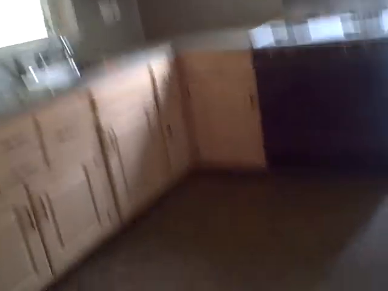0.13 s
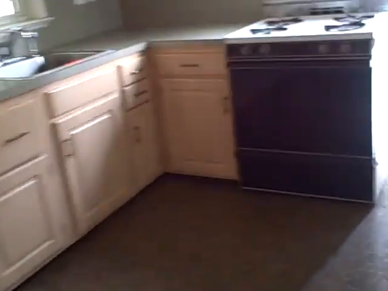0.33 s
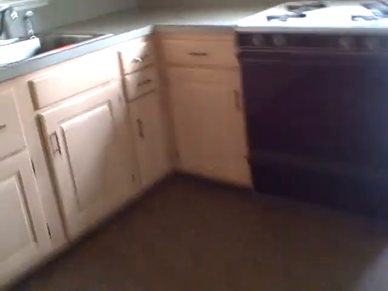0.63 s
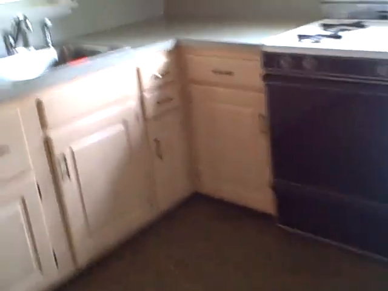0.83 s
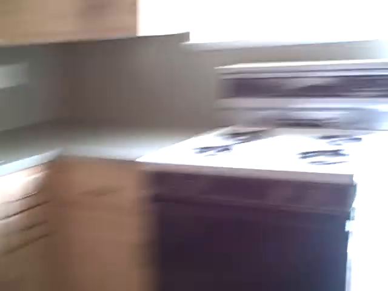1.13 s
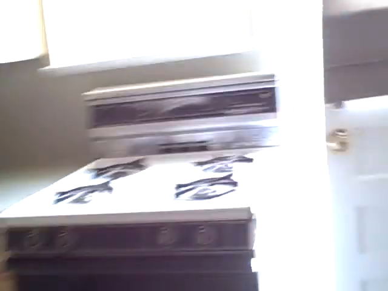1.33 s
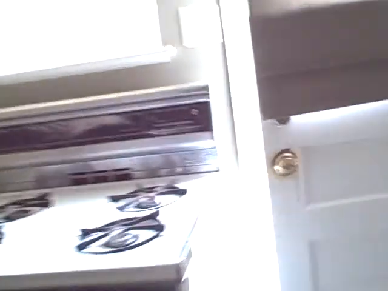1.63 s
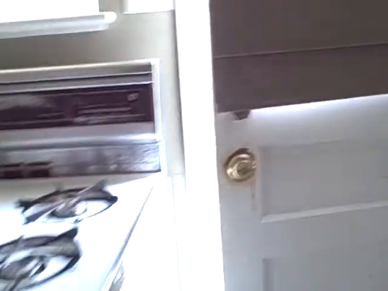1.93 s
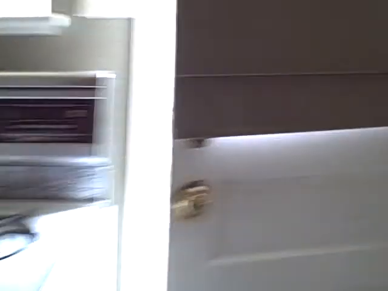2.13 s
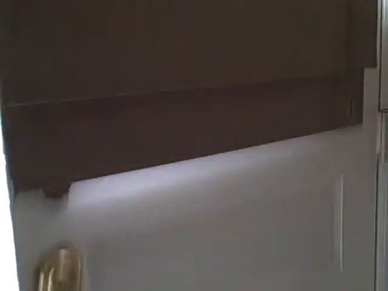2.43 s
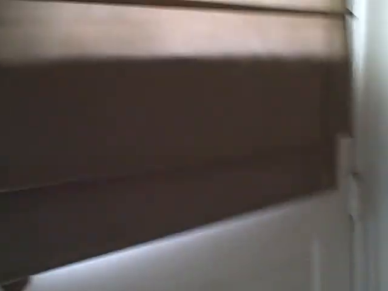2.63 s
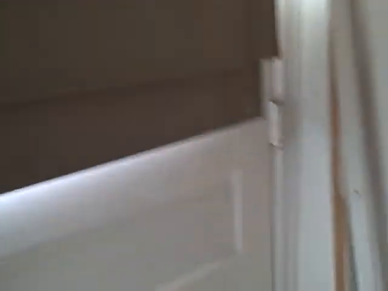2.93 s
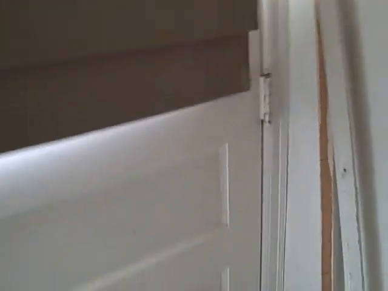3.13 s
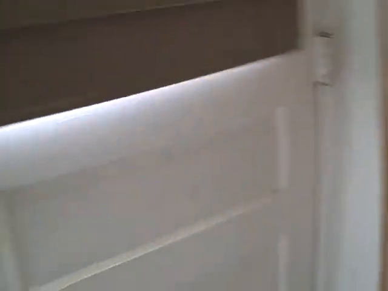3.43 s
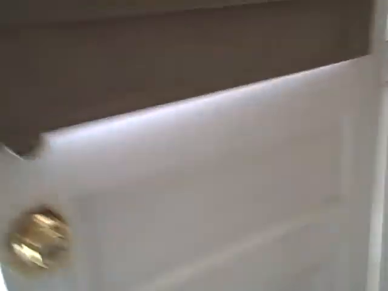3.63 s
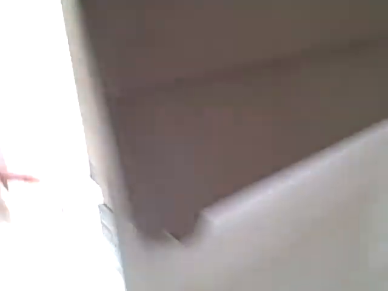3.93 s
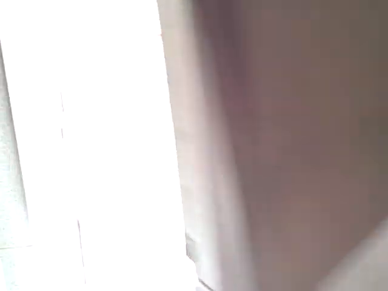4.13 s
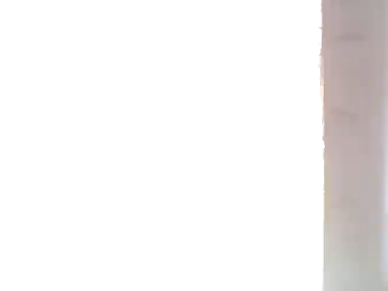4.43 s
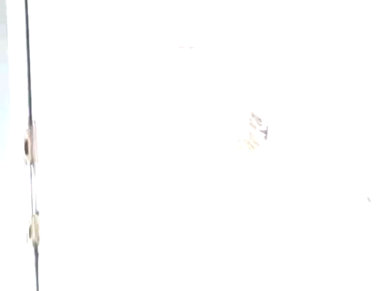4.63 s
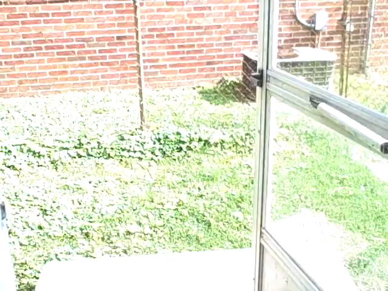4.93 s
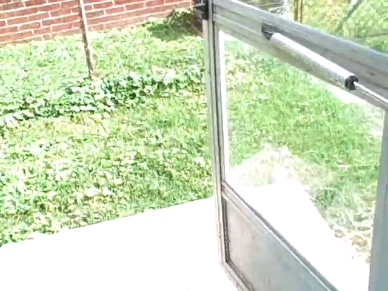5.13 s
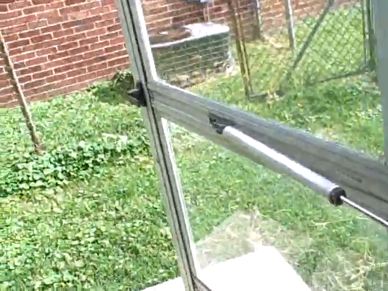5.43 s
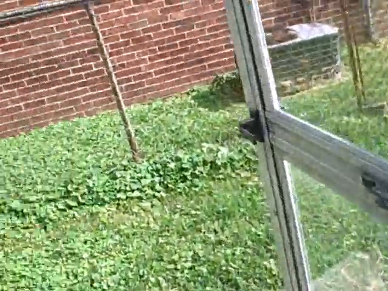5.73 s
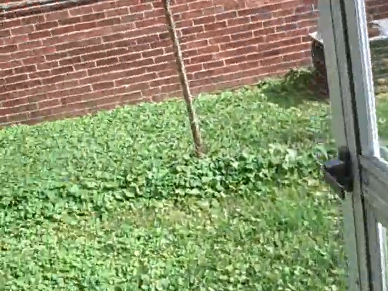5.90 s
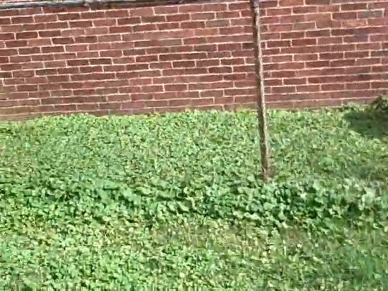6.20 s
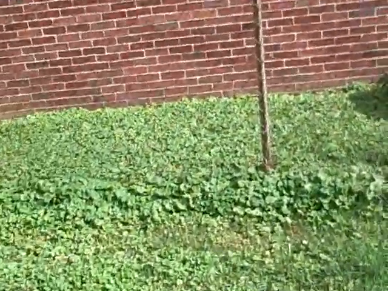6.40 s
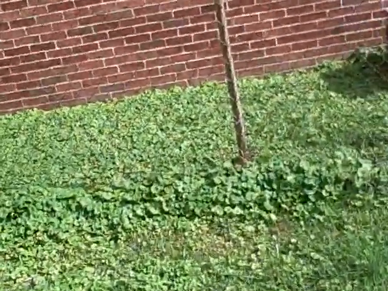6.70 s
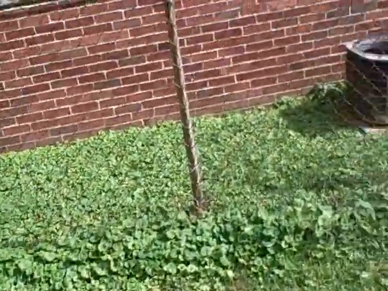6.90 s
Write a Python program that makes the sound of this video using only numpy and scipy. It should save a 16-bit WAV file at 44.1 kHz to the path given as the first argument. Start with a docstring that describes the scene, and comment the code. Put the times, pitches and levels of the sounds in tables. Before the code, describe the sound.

A handheld camera microphone catches a loud, multi-contact door slam ringing through a bare room, then quickening small ticks and a few heel knocks on springy boards. Two quick tugs free another door, with a latch click and low shudder. The quiet outdoor drone of cooling units gradually opens up, with thin insect hiss, while fingers knock and rub the plastic case until the end.

```python
"""Back door slam and a walk outside

A wooden door slams in a ringing kitchen: bursts of noise crack, thud and clatter, and fading tones ring the slab.
Something loose ticks ever faster; then heel knocks and low swings make footsteps on a springy floor.
The door is pulled open with woody tones and latch noise, and the camera is carried out through it.
Air conditioners hum and rush as shaped noise and steady tones, insects shrill in thin bands of noise,
and fingers tap on the camera body as short, dry tones with gritty ticks."""
import sys
import numpy as np
from scipy import signal
from scipy.fft import rfft, irfft, next_fast_len
from scipy.io import wavfile
from scipy.ndimage import map_coordinates

SR = 44100
rng = np.random.default_rng(int(sys.argv[2]) if len(sys.argv) > 2 else 0)


def master(y):
    """Save y as 16-bit WAV."""
    cut = np.clip(np.atleast_2d(y).T, -1, 1)
    pcm = np.round(cut * 32767)  # scale
    wavfile.write(sys.argv[1], SR, pcm.astype(np.int16))


N = 311346
T = np.arange(N) / SR  # time in the scene (s)
AGE = T[:SR * 3 // 2]  # time since a single event began (s), up to 1.5 s

# Tables of pitch_hz and level_db give the colour of a noise, whose loudness is set where it is used.
# A t60_s is the time in which a sound fades by 60 dB.

# colour of a heel on wood: pitch_hz, level_db (per Hz)
HEEL_COLOUR = [(60, -37), (150, -2), (320, -4.5), (600, -10), (900, -15), (2000, -25), (8000, -38)]
# colour of a small bright contact: pitch_hz, level_db (per Hz)
CLICK_COLOUR = [(500, -1), (2000, -3), (4000, -2), (7000, -3.5), (9500, -6.5), (13000, -12), (16000, -16.5)]
# fingers on the camera body: start_s, knock_db, pitch_hz, t60_s, tick_db
FINGER_TAPS = [(3.836, -50, 890, .02, -54), (4.9593, -30, 470, .014, -63), (5.7028, -26.5, 482, 0.029, -46),
               (5.7922, -35.5, 610, 0.019, -51), (5.824, -51, 1510, .03, -45),
               (5.9148, -43, 2400, .012, -42), (6.4949, -30.5, 904, 0.035, -60),
               (6.985, -32, 736, .035, -49)]


def amp(db):
    """Turn decibels into a gain."""
    return 10 ** (np.asarray(db) / 20)


def unit(x):
    """Scale a sound to an average (rms) strength of 1."""
    return x / np.sqrt(np.mean(x ** 2) + 1e-20)


def along(points, hz):
    """Read a table of (pitch_hz, value) between its rows, on a log pitch axis."""
    f, v = np.transpose(points)
    return np.interp(np.log(hz + 1), np.log(f + 1), v)


def fade(t, t60):
    """Die away by 60 dB in t60 seconds."""
    return np.exp(-np.log(1000) * t / t60)


def onset(rise):
    """Grow smoothly from 0 towards 1; a larger rise (s) is slower."""
    return 1 - np.exp(-AGE / rise)


def ramp(start, length):
    """Rise from 0 to 1 over length seconds."""
    return np.clip((T - start) / length, 0, 1)


def swell(s, width):
    """Rise and fall in a bell shape around s seconds."""
    return np.exp(-.5 * ((T - s) / width) ** 2)


def wobble(rate):
    """Draw a smooth random curve through rate random points a second."""
    points = rng.standard_normal(int(N * rate / SR) + 4)
    return map_coordinates(points, [T * rate])


def add(track, s, sound):
    """Mix a sound into the track at s seconds."""
    start = max(round(s * SR), 0)
    track[start:start + len(sound)] += sound[:N - start]


def noise(spectrum, size):
    """Colour white noise by weighting each of its frequencies, then scale it to rms 1."""
    m = next_fast_len(size)
    white = rfft(rng.standard_normal(m))
    weights = amp(along(spectrum, np.fft.rfftfreq(m, 1 / SR)))
    return unit(irfft(white * weights, m)[:size])


def echo(spectrum, rise):
    """Answer a blow as the kitchen does: reflections pile up, then each frequency dies at its own speed."""
    # how long the bare room rings: pitch_hz, t60_s
    kitchen_fade = [(50, 0.81), (130, 0.8), (300, 0.73), (900, 0.85), (2000, 0.81), (4200, 0.81),
                    (8000, 0.62), (15000, 0.62)]
    hz, t, z = signal.stft(noise(spectrum, len(AGE)), SR, nperseg=512)
    fading = z * fade(t, along(kitchen_fade, hz)[:, None])
    tail = signal.istft(fading, SR, nperseg=512)[1][:len(AGE)]
    return tail * onset(rise)


def ring(modes, rise, scatter_db):
    """Ring an object's fading tones (pitch_hz, level_db, t60_s), with random phases and varied levels."""
    tones = np.zeros(len(AGE))
    for hz, db, t60 in modes:
        strength = amp(db + scatter_db * rng.normal())
        tones += strength * fade(AGE, t60) * np.sin(2 * np.pi * (hz * AGE + rng.random()))
    return tones * onset(rise)


def throbs(rows, rise):
    """Swing low and die away once for each row of (start_s, level_db, pitch_hz, t60_s)."""
    out = np.zeros(N)
    for s, db, hz, t60 in rows:
        swing = np.sin(2 * np.pi * hz * AGE) * fade(AGE, t60)
        add(out, s, amp(db) * swing * onset(rise))
    return out


def click():
    """Make a small bright contact: a short burst of noise and its kitchen echo."""
    return echo(CLICK_COLOUR, rise=0.0026) + 2.15 * noise(CLICK_COLOUR, len(AGE)) * fade(AGE, 0.026)


def yard():
    """Air conditioners drone and rush; the doorway colours their hum until the camera is outside."""
    # base level of the yard from the approach to the door onwards: start_s, level_db
    yard_level = [(2.1, -62), (2.9, -56.5), (3.3, -56), (3.54, -57.5), (3.87, -58.5), (4.25, -57),
                  (5.04, -51.5), (5.55, -53.5), (5.8, -51.5), (6.62, -51), (7.06, -45)]
    # steady tones of the outdoor unit: pitch_hz, level_db (relative)
    machine_tones = [(143, -8), (163, 4), (203, -8), (239, -6.5), (636, -5)]
    # hum heard from inside, then outside: pitch_hz, level_db (per Hz)
    doorway_colour = [(70, -12), (130, 1), (180, 1.5), (220, -4.5), (275, 9), (310, -2), (365, -1),
                      (430, -10), (700, -49)]
    open_air_colour = [(70, -11), (130, 6), (165, 6), (185, -13.5), (205, 2.5), (260, -0.5), (340, -5.5),
                       (450, -41), (700, -36)]
    # colours of the rush, hiss and rumble: pitch_hz, level_db (per Hz)
    rush_colour = [(240, -17), (410, -9), (500, -1), (650, -3.5), (850, -1), (1050, -4), (1400, -5),
                   (2000, -8.5), (3400, -19), (4000, -20.5), (5500, -49), (9000, -90)]
    hiss_colour = [(1650, -15), (2800, -4.5), (4300, -1.5), (6200, -5.5), (7700, -11.5), (9400, -15.5),
                   (12000, -16), (13300, -23), (15800, -19)]
    rumble_colour = [(12, -9.5), (26, 5), (42, -5.5), (60, -1.5), (85, -6), (120, -14), (250, -51)]
    # level by place: kitchen_db, door_db, outside_db; hum and hiss count from the yard's level
    hum_by_place = (-1.5, 5, -1)
    hiss_by_place = (-6, -10, -16.5)
    rumble_by_place = (-50.5, -48, -48.5)

    far_db = -63.5  # level at the start, from the far side of the kitchen
    level_db = np.interp(T, *np.transpose([(0, far_db)] + list(yard_level)))
    near = ramp(2.1, 0.29)  # the camera comes up to the door
    outside = ramp(5.08, 0.97)  # and passes out into the open

    def by_place(kitchen, door, open_air):
        """Glide between the three levels as the camera moves."""
        return kitchen + (door - kitchen) * near + (open_air - door) * outside

    tones = np.zeros(N)
    for hz, db in machine_tones:
        strength = amp(db + 1.2 * wobble(4.6))
        tones += strength * np.sin(2 * np.pi * hz * T + 0.52 * wobble(4))
    hum = np.sqrt(1 - outside) * noise(doorway_colour, N)
    hum += np.sqrt(outside) * 0.92 * noise(open_air_colour, N)
    hum += 0.58 * outside ** 2 * unit(tones)

    # the bass wanders with the air at the microphone and swells as air moves through the open doorway
    draught_db = 2 * swell(4.9, 0.37) + 1.5 * wobble(7)
    rumble = amp(by_place(*rumble_by_place) + draught_db) * noise(rumble_colour, N)

    # the rush flutters only slightly
    flutter_db = 0.35 * wobble(12)
    rush = noise(rush_colour, N) + amp(by_place(*hiss_by_place)) * noise(hiss_colour, N)
    rush *= amp(flutter_db + 0.32)
    hum_gain = amp(by_place(*hum_by_place) + 1.85 * wobble(3.7))
    return rumble + amp(level_db) * (hum_gain * hum + rush)


def insects():
    """Narrow, swelling bands of shrilling, as of insects in the grass, come in as the door opens."""
    # the shrill bands: pitch_hz, width_hz, level_db (once outside), swell_db
    shrill_bands = [(7680, 1200, -72, .8), (9200, 660, -87, 3), (12100, 1140, -96, 3.5)]
    opened_db = np.interp(T, [2.7, 4.2, 5.5], [-22, -9, 0])
    out = np.zeros(N)
    for hz, width, db, swell_db in shrill_bands:
        colour = [(hz - 2 * width, -70), (hz - width, -16), (hz, 0), (hz + width, -16), (hz + 2 * width, -70)]
        out += amp(db + swell_db * wobble(10)) * noise(colour, N)
    return amp(opened_db) * out


def passing():
    """A broad band of the hum swells and sinks in pitch on the way through the doorway."""
    middle_s, start_hz, octaves_per_s = 5.25, 191.4, 0.92  # start_hz is the pitch at middle_s
    hz = start_hz * 2 ** (-octaves_per_s * np.clip(T - middle_s, -1, 1))
    phase = 2 * np.pi * np.cumsum(hz) / SR
    # random strengths, 110 points a second, spread the gliding tone into a band
    band = unit(wobble(110) * np.sin(phase) + wobble(110) * np.cos(phase))
    return amp(-48.5) * swell(middle_s, 0.44) * band


def rustle():
    """Cloth brushes unevenly on the walk to the door, as high noise that swells and wavers."""
    # colour of the cloth: pitch_hz, level_db (per Hz)
    cloth_colour = [(1000, -20), (4000, -12), (7000, -4), (12000, -1), (16000, 1)]
    return amp(-71.5 + 2.1 * wobble(9.6)) * swell(1.9, 0.49) * noise(cloth_colour, N)


def steps():
    """The heel knocks on the boards, sole and toe scuff, and the body's weight sways the floor."""
    # footfalls: start_s, heel_db, sway_db, scuff_db (before small offsets), toe_delay_s (after the sole)
    footfalls = [(.002, -49, -44, -54.5, 0.024), (1.083, -38.5, -29, -54.5, 0.077),
                 (1.685, -36.5, -22, -53.5, 0.092), (2.253, -46.5, -26.5, -50.5, .03),
                 (2.44, -47.5, -46, -60, .02)]
    # ringing of the floorboards: pitch_hz, level_db (relative), t60_s
    floorboards = [(214, -2.5, 0.21), (324, 1.5, 0.13), (415, -7.5, 0.19), (563, -7.5, 0.29),
                   (683, -5.5, 0.1)]
    sole_lag_s = 0.0051  # the sole scuffs just after the heel
    out = np.zeros(N)
    sway = -np.sin(2 * np.pi * 27 * AGE) * fade(AGE, 0.59) * onset(0.0078)
    for s, heel_db, sway_db, scuff_db, toe_delay_s in footfalls:
        knock = 0.75 * ring(floorboards, rise=0.0013, scatter_db=1.5)
        knock += 0.77 * noise(HEEL_COLOUR, len(AGE)) * fade(AGE, 0.078)
        add(out, s, amp(heel_db) * (knock + 0.63 * echo(HEEL_COLOUR, rise=0.021)))
        add(out, s + 0.0237, amp(sway_db) * sway)
        add(out, s + sole_lag_s, amp(scuff_db - 2) * echo(CLICK_COLOUR, rise=0.0039))
        add(out, s + sole_lag_s + toe_delay_s, amp(scuff_db - 1) * echo(CLICK_COLOUR, rise=0.0024))
    return out


def sweep():
    """The door brushes softly as it swings inwards: a brief swell of high, airy noise."""
    # colour of the brushing: pitch_hz, level_db (per Hz)
    brush_colour = [(1500, 4), (3000, -2), (4000, -3), (5200, -12), (8000, -17), (10500, -13), (12200, -7),
                    (13800, -14), (16000, -22)]
    return amp(-54.5) * swell(3.39, 0.065) * noise(brush_colour, N)


def rattle(count):
    """The last tap sets the case rattling: quick, weakening rebounds, as rows like the finger taps."""
    gap_s, first_db, loss_db = 0.01, -31.5, 7  # loss_db is per rebound
    rows = []
    for k, (shift, detune) in enumerate(rng.standard_normal((count, 2))):
        s = FINGER_TAPS[-1][0] + gap_s * (k + 1 + 0.109 * shift)
        db = first_db - loss_db * k
        hz = 1165 * np.exp(0.23 * detune)
        rows.append((s, db, hz, 0.03, db - 13.5))
    return rows


def taps():
    """Fingers knock the plastic case: short tones and a gritty tick; the grip rubs and strides jolt."""
    # the hand slides on the case: middle_s, level_db, width_s
    rubs = [(5.003, -56, 0.017), (5.814, -56.5, 0.04), (5.954, -56, 0.089), (7.022, -52, .025)]
    # colour of the sliding hand: pitch_hz, level_db (per Hz)
    rub_colour = [(500, -3), (2000, 1), (4000, 0.5), (7000, -5), (9500, -12.5), (13000, -17), (16000, -19)]
    # tugs and strides jolt the camera: start_s, level_db, pitch_hz, t60_s
    jolts = [(2.738, -31, 21, .3), (4.755, -26.5, 68, 0.087), (4.772, -28, 20, 0.23), (4.839, -36, 31, 1),
             (5.801, -31, 24, 0.1)]
    out = np.zeros(N)
    for s, db, hz, t60, tick_db in list(FINGER_TAPS) + rattle(count=4):
        phase = 2 * np.pi * hz * AGE
        case = np.sin(phase) + 0.5 * np.sin(1.6 * phase)
        case += 0.31 * np.sin(2.87 * phase) * fade(AGE, 0.027)
        case *= fade(AGE, t60)
        shake_colour = [(hz / 3, -12), (hz, 0), (hz * 2, -8), (hz * 8, -42)]
        shake = 0.34 * noise(shake_colour, len(AGE)) * fade(AGE, 0.11)
        # a sharp burst with a weak, longer tail
        tick = noise(CLICK_COLOUR, len(AGE)) * (fade(AGE, 0.024) + 0.16 * fade(AGE, 0.41))
        add(out, s, amp(db) * (case + shake) + amp(tick_db) * tick)
    grip = sum(amp(db) * swell(s, width) for s, db, width in rubs)
    rubbing = grip * amp(1.2 * wobble(180)) * noise(rub_colour, N)
    return out + rubbing + throbs(jolts, rise=0.0012)


def opening():
    """Tugs free the door: the held panel rings, the latch rasps, and the freed slab shudders."""
    # the door is tugged free of its frame: start_s, wood_db, latch_db
    tugs = [(2.6572, -33.5, -36), (2.706, -29.5, -45), (2.749, -40, -58), (2.819, -48, -64)]
    # ringing of the held door: pitch_hz, level_db (relative), t60_s
    held_panel = [(161.5, -8.5, 0.21), (265.6, 0, 0.2), (301, -3.5, 0.25), (362, -5, 0.12)]
    # colour of the latch: pitch_hz, level_db (per Hz)
    latch_colour = [(500, -3), (1500, 0), (2500, 0), (3600, 1.5), (4800, 0.5), (6800, 1), (9000, -1.5),
                    (13000, -6), (16000, -10)]
    # the freed slab flexes: start_s, level_db, pitch_hz, t60_s
    shudder = [(2.862, -34.5, 66.6, 0.68)]
    out = np.zeros(N)
    for s, wood_db, latch_db in tugs:
        wood = ring(held_panel, rise=0.00085, scatter_db=1.0) + 0.29 * echo(HEEL_COLOUR, rise=0.0015)
        latch = echo(latch_colour, rise=0.011) * fade(AGE, 5.1)
        add(out, s, amp(wood_db) * wood + amp(latch_db) * latch)
    # at the last tug the bolt springs out again
    bolt_colour = [(1500, -12), (3200, -1), (4900, 2), (6000, -11), (15000, -22)]
    bolt = noise(bolt_colour, len(AGE)) * fade(AGE, 0.18)
    add(out, tugs[-1][0], amp(-45) * bolt)
    return out + throbs(shudder, rise=0.008)


def settling(count):
    """Something loose swings after the slam; each swing is shorter and its tick weaker than the last."""
    s, gap_s, shrink = 0.803, 0.198, 0.82  # first tick (s), first gap, each gap relative to the one before
    first_db, loss_db = -48.5, 1.53  # loss_db is per tick
    out = np.zeros(N)
    for k in range(count):
        add(out, s, amp(first_db - loss_db * k) * click())
        s += gap_s * shrink ** k
    return out


def slam():
    """Each contact cracks, thuds and clatters; the hardest one sets the whole slab ringing."""
    # contacts of the slam: start_s, thud_db, clatter_db, crack_db (3 dB is added below)
    contacts = [(.411, -39, -52, -49.5), (0.417, -20, -21.5, -13), (.445, -16, -32, -27),
                (0.4769, -16, -16, -11), (.493, -20, -25, -24), (0.508, -27, -30, -18)]
    # low resonances of the slab and the room, and higher ones: pitch_hz, level_db (relative), t60_s
    slab_modes = [(46, -1.5, 0.37), (61.5, -9.5, 0.7), (84.8, -3, 0.77), (141, 1.5, 0.24), (169.7, -3, .55),
                  (199.4, -1.5, 0.62), (238, -20, 0.77), (307.3, -5.5, 0.64), (367.4, -9, 0.5),
                  (389, -10.5, 0.7), (479, -11, 0.62), (508, -10, 0.83), (563, -26, 0.72), (670, -13, 0.7),
                  (723, -3.5, 0.3), (768, -11.5, 0.77), (992, -12, 1), (1173, -9, 0.53), (1350, -26, 0.85),
                  (1576, -11, 0.48), (1738, -11.5, 0.71), (2920, -15, 0.6), (3060, -19, .7),
                  (3660, -23, .7)]
    # colours of the thud, the clatter and the latch on its strike plate: pitch_hz, level_db (per Hz)
    thud_colour = [(25, -1.5), (60, 0), (110, -6), (170, -2.5), (250, -4), (310, -12), (390, -2), (440, -9),
                   (510, -4.5), (680, -14), (1100, -11), (1500, -22), (2500, -26), (8000, -51)]
    clatter_colour = [(150, -48), (600, -4), (1100, -2.5), (1750, 2.5), (2050, -3), (2400, -1), (3700, -3),
                      (4500, -3.5), (4950, -10.5), (7100, -9), (8800, -17), (12000, -21), (16000, -27)]
    crack_colour = [(200, 0), (900, -13.5), (1400, -18), (1900, 9.5), (2700, -2), (3800, 0.5), (4600, -7),
                    (5500, -2), (6500, -19), (7800, -10), (9500, -28), (16000, -21)]
    out = np.zeros(N)
    for s, thud_db, clatter_db, crack_db in contacts:
        crack = amp(crack_db + 3) * noise(crack_colour, len(AGE)) * fade(AGE, 0.027)
        thud = amp(thud_db) * echo(thud_colour, rise=0.0025)
        # loose hardware buzzes against the wood, so the clatter comes in uneven clumps
        clumps = amp(2.2 * wobble(169)[:len(AGE)] * fade(AGE, 1.2))
        clatter = amp(clatter_db) * clumps * echo(clatter_colour, rise=0.0078)
        add(out, s, crack + thud + clatter)
    latch_s, slab_s = contacts[1][0], contacts[3][0]
    add(out, slab_s, amp(-14.0) * ring(slab_modes, rise=0.0011, scatter_db=0))
    # the swinging slab squeezes the air: a low tone grows until the latch strikes, then dies away
    since = T - latch_s
    growth, decay = np.exp(-np.abs(since) / 0.007), fade(np.abs(since), 0.89)
    squeeze = np.where(since < 0, growth, decay)
    return out + amp(-14.5) * squeeze * np.sin(2 * np.pi * 81 * since)


def scene():
    """Mix everything at one microphone."""
    door_and_floor = slam() + settling(count=6) + steps() + opening() + sweep()
    return (door_and_floor + taps() + yard() + passing() + insects() + rustle())[None]


def record(dry):
    """The microphone rounds off the loudest peaks and keeps nothing from its band limit up."""
    band_limit_hz = 15850
    rounded = dry / (1 + np.abs(dry / 0.74) ** 6) ** (1 / 6)
    m = next_fast_len(N + SR // 2)  # spare room after the end, so the filter does not wrap round
    kept = np.fft.rfftfreq(m, 1 / SR) < band_limit_hz
    return irfft(rfft(rounded, m) * kept, m)[..., :N]


dry = scene()
out = record(dry)
master(out)
```